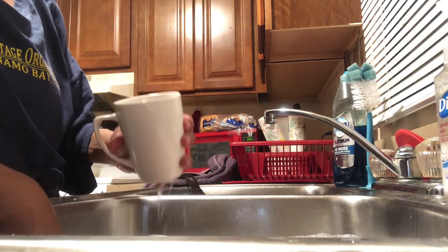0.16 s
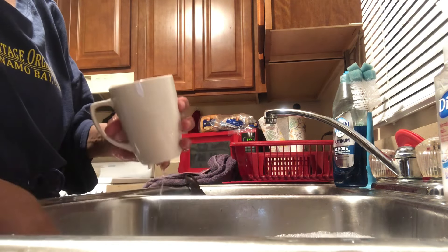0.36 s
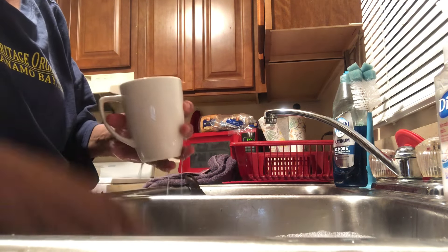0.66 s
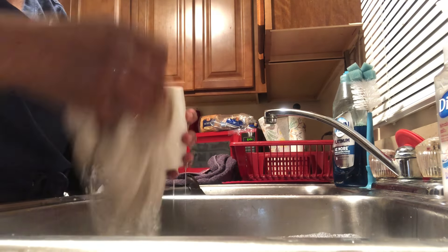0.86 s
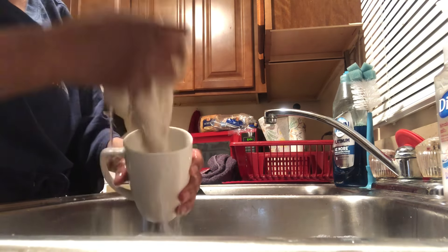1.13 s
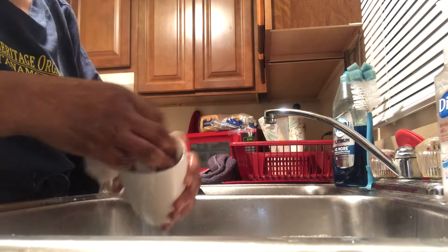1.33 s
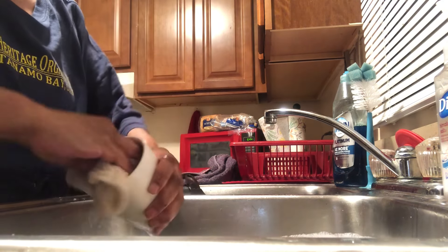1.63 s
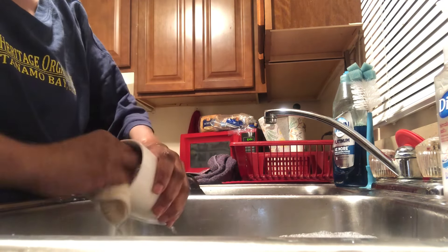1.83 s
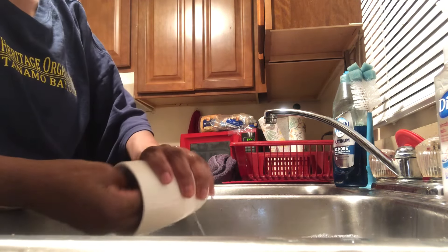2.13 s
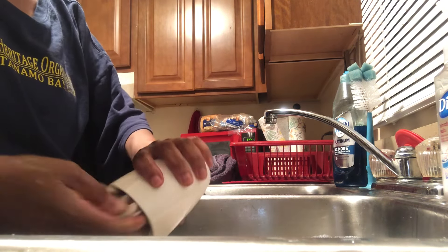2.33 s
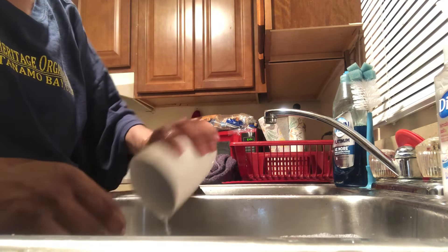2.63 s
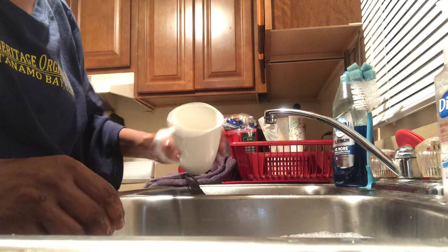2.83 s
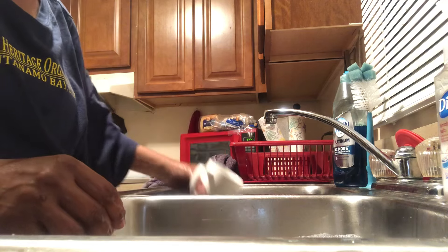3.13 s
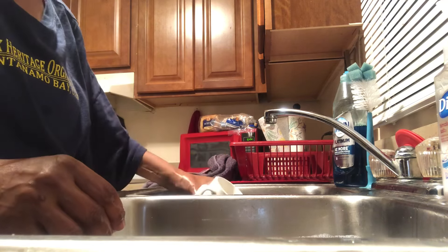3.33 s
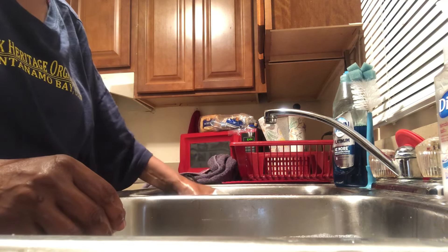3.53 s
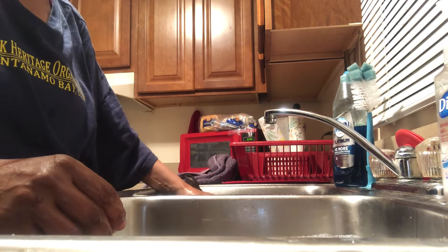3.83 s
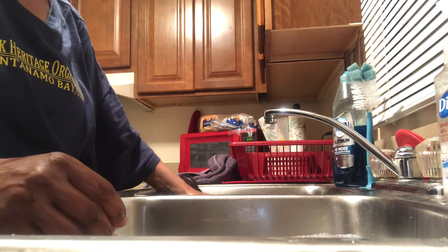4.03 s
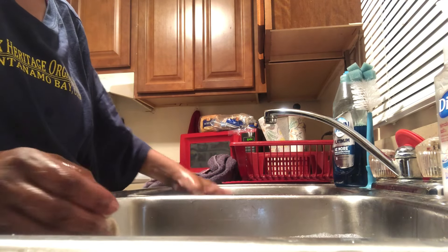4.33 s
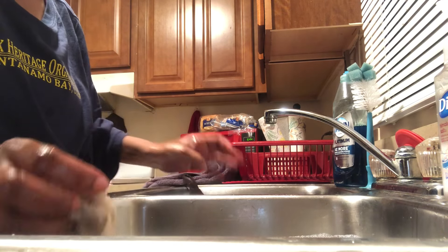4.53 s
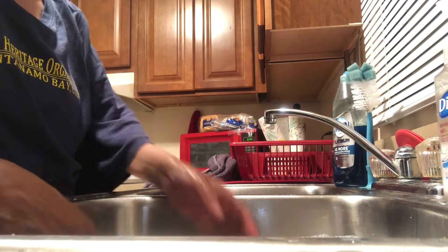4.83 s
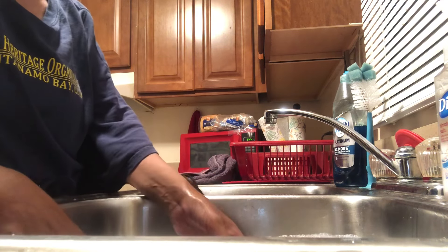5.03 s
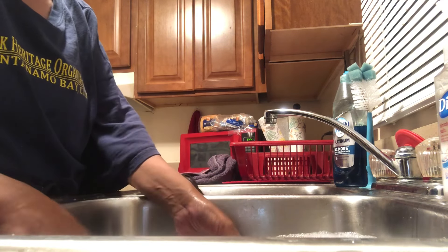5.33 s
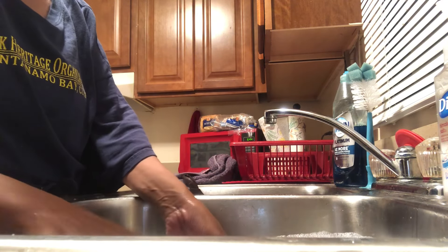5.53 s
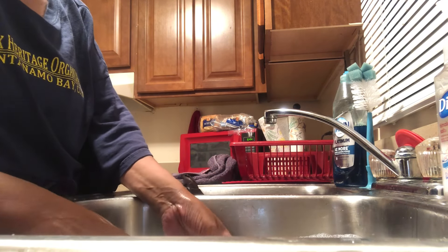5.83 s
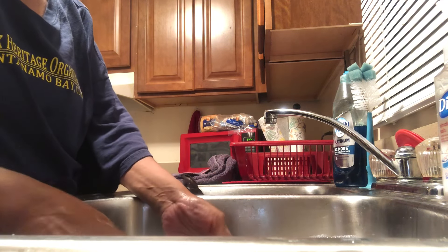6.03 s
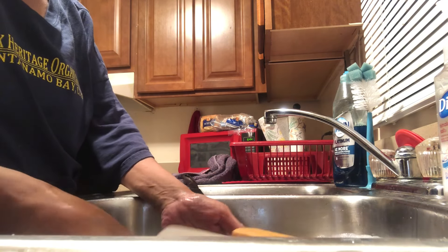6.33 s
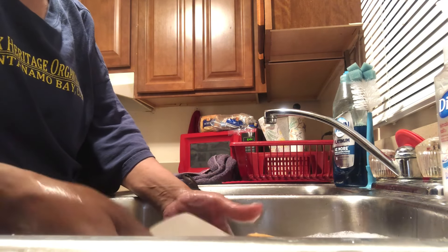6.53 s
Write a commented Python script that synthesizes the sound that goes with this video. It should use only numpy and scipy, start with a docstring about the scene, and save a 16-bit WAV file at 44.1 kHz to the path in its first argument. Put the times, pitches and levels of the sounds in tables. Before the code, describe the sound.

Close, lively drips and splashes over a steel basin, a ceramic mug set down with a ringing clunk, then muffled underwater dish knocks and a plate rattle.

```python
"""Small kitchen, still air throughout. Water runs off a wet cloth as a mug is wiped over a steel sink:
drops and bubbles are gliding sines with noise slaps, the runoff is bubble swarms and spray noise.
The mug is set down in the empty second basin, slides and is nudged: filtered modal blows, stick-slip rubbing.
Hands dip back into the dishwater: more drops, swishes, booming air pockets (low slow-swelling sines),
and sunken dishes that knock on the loaded steel; a utensil chimes, then a plate rattles."""
import sys
import numpy as np
from scipy import signal
from scipy.fft import rfft, irfft
from scipy.io import wavfile
from scipy.ndimage import uniform_filter1d

SR = 44100
rng = np.random.default_rng(int(sys.argv[2]) if len(sys.argv) > 2 else 0)


def master_out(mix):
    """Clip the mix to full scale and print it as 16-bit PCM to the path in sys.argv[1]."""
    frames = np.transpose(np.atleast_2d(mix))
    ceiling = np.clip(frames, -1, 1)
    pcm = np.round(ceiling * 32767).astype(np.int16)
    wavfile.write(sys.argv[1], SR, pcm)


N = 294577

# Levels are relative; the mix adds offsets.
# still kitchen air: f/Hz, level/dB
AIR = [(20, -58), (42, -20.5), (64, -7.5), (141, -8.5), (180, -15.5), (285, -17.5), (624, -22.5),
       (2220, -32), (16000, -47.5)]
AIR_DB = -65
# room decay: f/Hz, t60/s
ROOM_T60 = [(150, 0.51), (1000, 0.3), (4000, 0.27), (14000, 0.21)]
EDGE_HZ = 16100

# gushes off cloth and hands: t/s, length/s, gurgle level/dB, spray level/dB
GUSHES = [(0.016, 0.75, -62.5, -84), (0.723, 0.31, -72, -56.5), (1.035, 0.016, -45.5, -48),
          (1.13, 0.24, -56, -51.5), (1.526, 0.08, -53.5, -77.5), (1.836, 0.046, -56, -61.5),
          (2.083, 0.15, -59, -73), (2.311, 0.1, -52.5, -62), (4.74, 0.057, -49.5, -53.5),
          (4.888, 0.078, -52, -58.5), (5.327, 0.22, -58.5, -85), (5.995, 0.11, -51.5, -76),
          (6.208, 0.38, -56.5, -73)]
GUSH_RISE_S, GUSH_FALL_S = 0.027, 0.033
# trickle between gushes, hands over the water: t/s, length/s, level/dB
TRICKLES = [(0, 2.67, -65.5), (4.6, 3, -74)]
TRICKLE_RISE_S, TRICKLE_FALL_S, TRICKLE_SPRAY_DB = 0.67, 0.099, -1.5
# runoff gurgle colour: f/Hz, level/dB
GURGLE = [(120, -8.5), (240, -3.5), (600, -3.5), (1100, 1), (2200, -8), (3500, -25), (7000, -41)]
# fine spray colour: f/Hz, level/dB
SPRAY = [(1200, -14), (3000, 0), (5000, -1.5), (7200, -2), (8500, -6.5), (12000, -10), (16000, -11)]
# small random drops
DRIPS_PER_S, DRIP_LOW_HZ, DRIP_HIGH_HZ, DRIP_SPREAD_DB = 80, 1100, 7000, 7
DRIP_CYCLES, DRIP_CYCLES_RATIO, DRIP_CLIMB, DRIP_SPLASH_DB = 13, 3.5, .6, -6
WANDER_S = .06

# loudest drops on the dishwater: t/s, bubble peak level/dB, bubble f/Hz, splash level/dB
DROPS = [(.047, -32.5, 3090, -82), (0.0717, -37, 770, -55.5), (.116, -21, 1045, -63),
         (.1334, -24.5, 2170, -54), (.177, -31, 2200, -58), (.323, -30.5, 2760, -85),
         (.341, -31, 1160, -57), (0.393, -40, 1120, -56), (0.529, -38, 1680, -85), (.6, -29.5, 2780, -57.5),
         (.691, -30, 2240, -56), (0.755, -35, 1680, -54.5), (0.799, -35.5, 1280, -57),
         (0.854, -32, 3520, -51), (.889, -32, 2030, -52), (0.979, -34, 4560, -62),
         (1.009, -34, 3350, -54.5), (1.032, -24, 1170, -52), (1.051, -31, 1180, -73),
         (1.108, -35, 4400, -74), (1.159, -35, 1240, -48.5), (1.176, -38, 2330, -45.5),
         (1.208, -34, 1200, -62), (1.234, -31.5, 1730, -49), (1.259, -26, 965, -44.5),
         (1.2738, -18.5, 1710, -48.5), (1.342, -37, 3960, -62), (1.358, -28, 4270, -67),
         (1.455, -25.5, 4730, -73), (1.4678, -22, 1960, -40), (1.529, -15.5, 7060, -48.5),
         (1.7, -28, 1890, -57), (1.834, -27.5, 1660, -49.5), (1.863, -42, 1750, -53),
         (1.902, -32, 1520, -53), (2.053, -29.5, 2750, -59), (2.11, -44, 3280, -55.5),
         (2.134, -27.5, 3050, -71), (2.227, -24, 6300, -51.5), (2.309, -34, 1050, -48.5),
         (2.32, -25, 5960, -64), (2.447, -33, 1560, -49), (2.467, -39, 1490, -47),
         (2.523, -33.5, 1720, -61), (2.701, -36.5, 2740, -60.5), (4.745, -26.5, 887, -55),
         (4.785, -30.5, 906, -58.5), (4.817, -33, 1110, -73), (4.842, -27.5, 1030, -84),
         (4.865, -21.5, 1140, -79), (4.905, -29.5, 2460, -44), (6.209, -31.5, 3250, -66),
         (6.222, -30.5, 2840, -68), (6.356, -32, 1800, -76), (6.429, -35, 1670, -49.5)]
# slap of one drop: f/Hz, level/dB
SPLASH = [(500, -16), (1300, 1), (3000, 9), (5000, 6), (7200, -2), (8500, -11), (12000, -14.5),
          (16000, -13)]
# large bubbles that ring on: t/s, peak level/dB, first f/Hz, last f/Hz, t60/s
BUBBLES = [(.49, -41.5, 620, 570, 0.03), (0.768, -38.5, 1213, 1320, 0.069), (0.812, -44.5, 920, 1470, 0.14),
           (0.937, -40, 2570, 3650, 0.057), (1.041, -37, 2100, 4300, 0.031), (1.275, -22.5, 609, 674, 0.11),
           (1.294, -30, 647, 695, 0.043), (1.605, -30.5, 1125, 1170, 0.031),
           (1.632, -31.5, 1150, 1190, 0.036), (2.08, -52.5, 321, 341, 0.27), (2.187, -45.5, 923, 990, 0.19),
           (2.324, -37, 353, 400, 0.15), (2.405, -36.5, 1034, 767, 0.1), (4.869, -27.5, 1550, 3420, 0.046),
           (5.058, -30, 713, 1980, .11), (6.292, -36, 1676, 1710, 0.052), (6.378, -33.5, 780, 740, 0.022)]
# flung droplets and bursting suds: t/s, level/dB
FLICKS = [(0.178, -39.5), (1.15, -34.5), (1.1767, -30), (1.241, -31), (1.343, -41), (1.564, -39),
          (1.831, -45), (2.247, -44), (2.379, -40), (2.439, -34), (2.442, -32)]

# falling water, hands, sunken dishes on the full basin: t/s, level/dB, contact corner f/Hz
BASIN_KNOCKS = [(.072, -48.5, 900), (.394, -49.5, 800), (4.935, -36, 90.5), (5.346, -49, 2370),
                (5.431, -32.5, 775), (5.567, -28, 720), (5.786, -25, 880), (5.794, -22, 407),
                (5.813, -24, 564), (5.843, -20, 298), (5.875, -33, 1010), (5.898, -29, 413),
                (5.943, -38, 2730), (5.97, -17.5, 100), (6.008, -17, 114), (6.222, -42, 555),
                (6.499, -29.5, 1440), (6.507, -27, 520), (6.553, -29, 705), (6.578, -24.5, 420),
                (6.634, -33, 640), (6.666, -36, 350)]
# water-loaded basin modes: f/Hz, level/dB, t60/s
FULL_MODES = [(86, -15, .25), (145, -17, .15), (233, -3, .15), (262, -5, .13), (373, -4, .16),
              (428, -7, .13), (519, 3, .15), (565, -2, .15), (646, -9, .15), (926, -7, .18),
              (1025, -9, .13), (1480, -15, .13)]
# its crowded modes: f/Hz, level/dB
FULL_WASH = [(50, -32), (170, -1), (260, 0.5), (520, -1), (750, -0.5), (1300, -4), (2200, -10.5),
             (6000, -33.5), (15000, -45.5)]
# contact tick colour: f/Hz, level/dB
TICK = [(400, -20), (1200, 11), (2800, 13), (4300, 6.5), (6000, 0), (8500, -8.5), (15000, -13.5)]
TICK_CORNER_HZ = 1000
BEND_S, BEND_HZ = .002, 1000
SPOT_DB, SLOSH_RATIO = 2.5, .012

# mug in the empty basin: t/s, level/dB, contact corner f/Hz, clunk level/dB
MUG_KNOCKS = [(3.651, -24.5, 2050, -14), (3.898, -38, 790, -32.5), (3.909, -47, 560, -35),
              (4.003, -33, 720, -21), (4.042, -35.5, 4100, -24.5), (4.064, -34.5, 805, -25.5),
              (4.226, -39.5, 750, -33)]
# empty basin modes: f/Hz, level/dB, t60/s
EMPTY_MODES = [(140, -11, .27), (260, -18, .28), (355, -18, .2), (715, -8, .1), (795, -3, .18),
               (897, -1, .2), (1195, -4, .22), (1250, -8, .2), (1795, -14, .24)]
# its crowded modes: f/Hz, level/dB
EMPTY_WASH = [(30, -48), (90, -15), (170, -8.5), (420, -10), (800, -5), (1600, -8.5), (2600, -11.5),
              (4200, -16.5), (6000, -9), (15000, -21.5)]
# glazed mug modes: f/Hz, level/dB, t60/s
MUG_MODES = [(1890, -14, .28), (3030, -16, .25), (3397, -23, .22), (3640, -20, .16), (4480, -18, .16),
             (5190, -20, .2), (5470, -20, .18), (6100, -21, .15), (7430, -24, .12)]
CLUNK_HZ, CLUNK_T60_S = 755, 0.022
# mug's foot slides on steel: t/s, length/s, level/dB
SLIDE = [(3.903, 0.074, -34.5)]
# sliding colour: f/Hz, level/dB
GRIT = [(60, -20), (130, -2.5), (260, 20), (380, 4.5), (600, 13), (950, -11), (1500, -3.5), (4500, -8.5),
        (15000, -28)]

# hand sweeps through water, dragging dishes: t/s, length/s, level/dB
SWEEPS = [(5.195, 0.034, -41.5), (5.36, 0.067, -51.5), (6.44, 0.14, -49)]
# sweep colour: f/Hz, level/dB
SWISH = [(60, -12), (250, -8.5), (1000, -10), (2500, -2), (7000, 6), (15000, -1)]
# air pockets shut under a sinking dish: t/s, peak level/dB, f/Hz, t60/s
GULPS = [(5.441, -17.5, 238, .11), (5.484, -28, 250, .1), (5.567, -13, 243, .1)]
# utensil blows among the dishes: t/s, level/dB
CHINKS = [(5.816, -53), (5.826, -53), (5.838, -57)]
# utensil modes: f/Hz, level/dB, t60/s
UTENSIL = [(5076, 0, .09), (6578, -8, .1), (8274, -6, .1), (11080, -13, .09)]
# plate rattles on steel as it is lifted: t/s, level/dB
RATTLES = [(6.501, -27), (6.54, -38), (6.558, -32), (6.577, -37), (6.634, -44)]
# plate modes: f/Hz, level/dB, t60/s
PLATE = [(880, 0, .16), (1210, -4, .15), (1480, -7, .12), (1890, -12, .1), (2130, -9, .08), (2790, -12, .1)]


def amp(db):
    """Decibels to gain."""
    return 10 ** (np.asarray(db) / 20)


def unit(x):
    """Scales to rms 1."""
    return x / np.sqrt(np.mean(x ** 2) + 1e-20)


def read(points, hz):
    """Interpolates a table on a log-frequency axis."""
    f, value = np.transpose(points)
    return np.interp(np.log(hz + 1), np.log(f + 1), value)


def add(mix, s, sound):
    """Mixes a sound in at time s."""
    part = mix[max(round(s * SR), 0):][:len(sound)]
    part += sound[:len(part)]


def colour(x, spectrum):
    """Filters x by a spectrum table, to rms 1."""
    gain = amp(read(spectrum, np.fft.rfftfreq(len(x), 1 / SR)))
    return unit(irfft(rfft(x) * gain, len(x)))


def envelope(rows, rise_s, fall_s):
    """Gain for rows of t/s, length/s, level/dB: exponential swell before t, hold, exponential fall."""
    t = np.arange(N) / SR
    power = np.zeros(N)
    for s, length, db in rows:
        before = np.maximum((s - t) / rise_s, 0)
        after = np.maximum((t - s - length) / fall_s, 0)
        power += amp(db) ** 2 * np.exp(-2 * before - 2 * after)
    return np.sqrt(power)


def still_air():
    """Steady coloured noise of the still kitchen."""
    return amp(AIR_DB) * colour(rng.standard_normal(N), AIR)


def kitchen(x, walls_db, walls_s, room_db):
    """Sparse quick echoes from the basin walls, then a room tail that decays per frequency."""
    t = np.arange(SR // 2) / SR
    taps = rng.choice([-1., 1.], (2, len(t))) * (rng.random((2, len(t))) < 3000 / SR)
    walls = taps[0] * np.exp(-t / walls_s) * (t > .0012)
    hz, when, z = signal.stft(taps[1] * (t > .007), SR, nperseg=256)
    decay = amp(-60 * when / read(ROOM_T60, hz)[:, None])
    tail = signal.istft(z * decay, SR, nperseg=256)[1][:len(t)]
    echoes = amp(walls_db) * walls / np.linalg.norm(walls) + amp(room_db) * tail / np.linalg.norm(tail)
    return x + signal.oaconvolve(x, echoes)[:N]


def wander(x, walls_db, walls_s, room_db, count=6):
    """Landing point crossfades around a cycle of spots, one per WANDER_S, each with its own echoes."""
    spot = np.arange(N) / SR / WANDER_S
    shares = [np.maximum(1 - abs((spot - k) % count - 1), 0) for k in range(count)]
    return sum(kitchen(x * share, walls_db, walls_s, room_db) for share in shares)


def bubble(hz, last_hz, t60, swell_cycles=0.12):
    """A pulsating bubble: a sine swells, decays, and glides from hz towards last_hz."""
    t = np.arange(int(t60 * SR) + 8) / SR
    turns = np.cumsum(last_hz + (hz - last_hz) * np.exp(-2 * t / t60)) / SR
    swell = 1 - np.exp(-(t * hz / swell_cycles) ** 2)
    shape = swell * np.exp(-np.log(1000) * t / t60)
    return shape / shape.max() * np.sin(2 * np.pi * turns)


def burst(spectrum, decay_s, rise_s, patchy_db):
    """A brief crack of noise, with chance peaks in its colour."""
    t, hz = np.arange(SR // 8) / SR, np.geomspace(300, 16000, 40)
    patches = np.column_stack([hz, read(spectrum, hz) + patchy_db * rng.standard_normal(len(hz))])
    noise = colour(rng.standard_normal(len(t)), patches)
    return noise * np.exp(-t / decay_s) * (1 - np.exp(-t / rise_s))


def drop(db, hz, splash_db, cycles=16, glide_ratio=0.99, splash_s=0.0019, splash_rise_s=0.00049):
    """A drop slaps the surface and traps a short-lived bubble, its pitch gliding by glide_ratio."""
    sound = amp(splash_db) * burst(SPLASH, splash_s, splash_rise_s, patchy_db=6)
    add(sound, 0, amp(db) * bubble(hz, hz * glide_ratio, cycles / hz, swell_cycles=.7))
    return sound


def patter(low_hz, high_hz, cycles, spread_db, count):
    """A swarm of small rising bubbles of many pitches, a few much louder than the rest."""
    out = np.zeros(N)
    for when, pitch, size, climb in rng.random((count, 4)):
        hz = low_hz * (high_hz / low_hz) ** pitch
        grain = bubble(hz, hz * (1 + climb / np.pi), cycles / hz)
        size_db = spread_db * min(-np.log(1 - size), np.pi)
        add(out, when * N / SR, amp(size_db) * grain / np.linalg.norm(grain))
    return out


def drips():
    """Small drops of chance level, pitch and ring, unevenly spaced; longer rings chirp further up."""
    out = np.zeros(N)
    for k, (late, pitch, size, life) in enumerate(rng.random((int(DRIPS_PER_S * N / SR), 4))):
        hz = DRIP_LOW_HZ * (DRIP_HIGH_HZ / DRIP_LOW_HZ) ** pitch
        db = DRIP_SPREAD_DB * (2 * size - 1)
        cycles = DRIP_CYCLES * DRIP_CYCLES_RATIO ** life
        sound = drop(db, hz, db + DRIP_SPLASH_DB, cycles, 1 + DRIP_CLIMB * life)
        add(out, (k + late) / DRIPS_PER_S, sound)
    return out


def flow():
    """Gurgle and spray gains: gushes power-summed with a thin trickle."""
    trickle = envelope(TRICKLES, TRICKLE_RISE_S, TRICKLE_FALL_S)
    gurgle = envelope([(s, length, db) for s, length, db, _ in GUSHES], GUSH_RISE_S, GUSH_FALL_S)
    spray = envelope([(s, length, db) for s, length, _, db in GUSHES], GUSH_RISE_S, GUSH_FALL_S)
    return np.hypot(gurgle, trickle), np.hypot(spray, amp(TRICKLE_SPRAY_DB) * trickle)


def clumps(depth_db=3.5):
    """Uneven spurts: a gain that wanders by chance, some tens of times a second."""
    smooth = uniform_filter1d(uniform_filter1d(rng.standard_normal(N), size=600), size=300)
    return amp(depth_db * unit(smooth))


def runoff(gurgle_db=-3, spray_db=-.5, drip_db=10.5, fizz_gain=.5, ticks_per_s=800):
    """Running water: low bubbles, small drips, and fine spray over the fizz of the suds."""
    gurgle = colour(patter(low_hz=200, high_hz=6500, cycles=21, spread_db=5.5, count=3600), GURGLE)
    droplets = unit(patter(low_hz=2800, high_hz=11000, cycles=22, spread_db=8.5, count=2800))
    ticks = unit(rng.standard_normal(N) * (rng.random(N) < ticks_per_s / SR))
    spray = colour(droplets + .5 * ticks + fizz_gain * rng.standard_normal(N), SPRAY)
    gurgling, spraying = flow()
    low = (amp(gurgle_db) * gurgle + amp(drip_db) * drips()) * gurgling
    return low + amp(spray_db) * spray * spraying * clumps()


def drops(splash_db=17, drop_db=-2, bubble_db=0):
    """Heavy drops, and large bubbles with their own glide and decay."""
    out = np.zeros(N)
    for s, db, hz, spray_db in DROPS:
        add(out, s, drop(db + drop_db, hz, spray_db + splash_db))
    for s, db, hz, last_hz, t60 in BUBBLES:
        add(out, s, amp(db + bubble_db) * bubble(hz, last_hz, t60))
    return out


def ring(modes, t):
    """Decaying sine modes after one blow."""
    return sum(amp(db - 60 * t / t60) * np.sin(2 * np.pi * hz * t) for hz, db, t60 in modes)


def lag(x):
    """Bending waves take BEND_S at BEND_HZ; lower ones are slower, so the bass arrives late."""
    hz = np.fft.rfftfreq(len(x), 1 / SR)
    return irfft(rfft(x) * np.exp(-4j * np.pi * BEND_S * np.sqrt(BEND_HZ * hz)), len(x))


def basin(modes, wash, wash_db, wash_t60, slap_db, slap_s):
    """Steel struck: clear modes varying with spot and load, and crowded ones starting with a slap."""
    t = np.arange(SR * 2 // 3) / SR
    crowd = colour(rng.standard_normal(len(t)), wash)
    chance = rng.uniform(-0.86, 1, (len(modes), 2))
    struck = [(hz * (1 + SLOSH_RATIO * load), db + SPOT_DB * spot, t60)
              for (hz, db, t60), (load, spot) in zip(modes, chance)]
    return ring(struck, t) + crowd * (amp(wash_db - 60 * t / wash_t60) + amp(slap_db) * np.exp(-t / slap_s))


def full_basin():
    """The basin weighed down by dishwater, which damps the crowded modes quickly."""
    return lag(basin(FULL_MODES, FULL_WASH, wash_db=-4.5, wash_t60=.23, slap_db=1, slap_s=.01))


def knocks(rows, body, tick_s, tick_rise_s, tick_db, tick_db_per_octave):
    """Blows: softer contact low-passes the body; harder contact ticks more."""
    out = np.zeros(N)
    for s, db, corner_hz, *_ in rows:
        contact = signal.butter(2, min(corner_hz, SR / 3), fs=SR)
        add(out, s, amp(db) * signal.lfilter(*contact, body()))
        hard_db = db + tick_db + tick_db_per_octave * np.log2(corner_hz / TICK_CORNER_HZ)
        add(out, s, amp(hard_db) * burst(TICK, tick_s, tick_rise_s, patchy_db=9.0))
    return out


def radiate(x):
    """Thin steel radiates almost nothing in the deep bass."""
    return signal.sosfilt(signal.butter(5, 72, "highpass", fs=SR, output="sos"), x)


def flicks():
    """Tiny droplets and suds give a bright tick and no bubble."""
    out = np.zeros(N)
    for s, db in FLICKS:
        add(out, s, amp(db) * burst(SPRAY, .0014, .0001, patchy_db=2.5))
    return out


def mug_ring():
    """The mug's own modes after one tap."""
    return ring(MUG_MODES, np.arange(SR * 2 // 3) / SR)


def empty_basin():
    """The second basin, bright and dry, with the mug ringing in it."""
    steel = basin(EMPTY_MODES, EMPTY_WASH, wash_db=-10, wash_t60=.4, slap_db=1, slap_s=.017)
    return lag(steel) + mug_ring()


def clunks():
    """Each mug knock starts with a short clunk: steel under the foot, damped by the mug's weight."""
    out = np.zeros(N)
    for s, _, _, db in MUG_KNOCKS:
        add(out, s, amp(db) * bubble(CLUNK_HZ, CLUNK_HZ, CLUNK_T60_S, swell_cycles=2.4))
    return out


def dragged_basin():
    """Pressed by the sliding mug, the steel rings only briefly."""
    damped = [(hz, db, t60 * .5) for hz, db, t60 in EMPTY_MODES]
    return basin(damped, EMPTY_WASH, wash_db=-10, wash_t60=.1, slap_db=3, slap_s=.004)


def rub(body, spectrum, stroke, slips_per_s):
    """A surface catches and slips: jittered random impulses shake the basin."""
    slips = np.zeros(N)
    for k, (late, size) in enumerate(rng.random((int(slips_per_s * N / SR), 2))):
        add(slips, (k + late) / slips_per_s, [2 * size - 1])
    return colour(signal.oaconvolve(slips, body())[:N], spectrum) * stroke


def scrape(ring_db=-20):
    """The mug's foot judders over the steel, and the rubbing sets the mug singing."""
    stroke = envelope(SLIDE, rise_s=0.028, fall_s=0.023)
    singing = unit(signal.oaconvolve(rng.standard_normal(N), mug_ring())[:N])
    return rub(dragged_basin, GRIT, stroke, slips_per_s=210) + amp(ring_db) * singing * stroke


def sweeps():
    """Hands sweep dishes along the full basin in dense slips."""
    return rub(full_basin, SWISH, envelope(SWEEPS, rise_s=0.029, fall_s=0.023), slips_per_s=2100)


def gulps(swell_cycles=2.2):
    """A trapped pocket of air booms like a very large bubble of steady pitch."""
    out = np.zeros(N)
    for s, db, hz, t60 in GULPS:
        add(out, s, amp(db) * bubble(hz, hz, t60, swell_cycles))
    return out


def chinks(blows, modes, rough):
    """A hard, light thing rings and chatters against its neighbour: noise-modulated modes."""
    out, t = np.zeros(N), np.arange(SR // 3) / SR
    for s, db in blows:
        chatter = 1 + min(rough, 1) * unit(uniform_filter1d(rng.standard_normal(len(t)), size=90))
        struck = [(hz, mode_db + SPOT_DB * rng.standard_normal(), t60) for hz, mode_db, t60 in modes]
        add(out, s, amp(db) * chatter * ring(struck, t))
    return out


def scene():
    """Water, mug, sunken dishes and air in the kitchen."""
    water = wander(runoff() + drops() + flicks(), walls_db=-3.5, walls_s=.004, room_db=-6.5)
    mug = knocks(MUG_KNOCKS, empty_basin, tick_s=0.04, tick_rise_s=0.0033,
                 tick_db=-21.5, tick_db_per_octave=4.5)
    mug += clunks() + scrape()
    mug = kitchen(radiate(mug), walls_db=-36.0, walls_s=0.018, room_db=-9.0)
    dishes = knocks(BASIN_KNOCKS, full_basin, tick_s=0.014, tick_rise_s=0.0011,
                    tick_db=-14, tick_db_per_octave=14.0)
    dishes += sweeps()
    rattles = chinks(CHINKS, UTENSIL, rough=1.0) + chinks(RATTLES, PLATE, rough=0.42)
    sunken = kitchen(radiate(dishes + gulps()) + rattles, walls_db=-7, walls_s=.004, room_db=-12)
    return (water + mug + sunken + still_air())[None]


def record(dry):
    """Band limit at EDGE_HZ."""
    lowpass = signal.firwin(511, EDGE_HZ, window=("kaiser", 9), fs=SR)
    return signal.oaconvolve(dry, lowpass[None], "same")


dry = scene()
out = record(dry)
master_out(out)
```